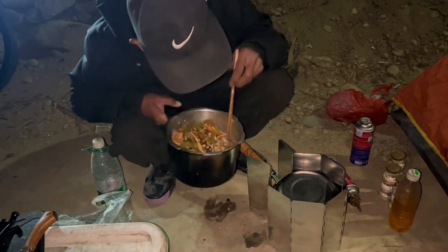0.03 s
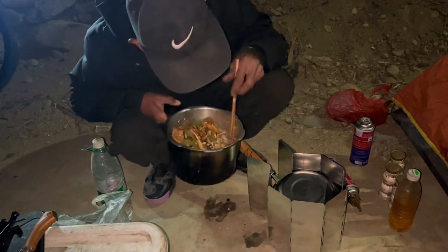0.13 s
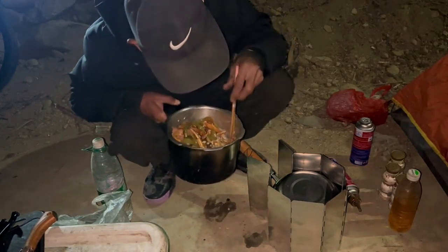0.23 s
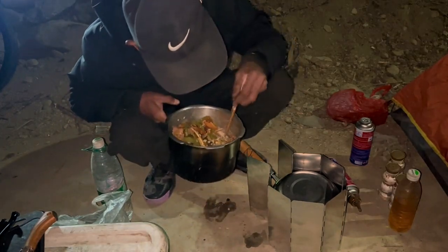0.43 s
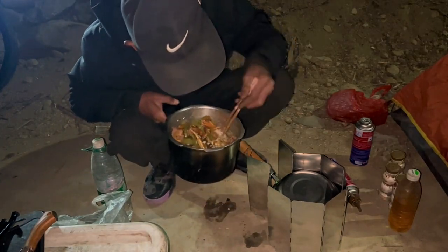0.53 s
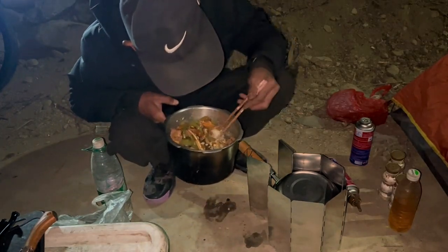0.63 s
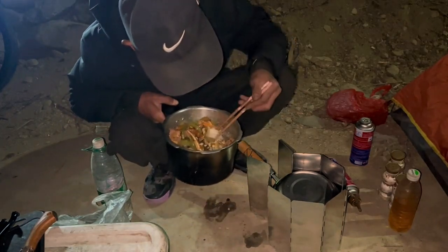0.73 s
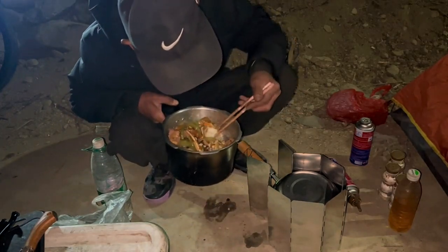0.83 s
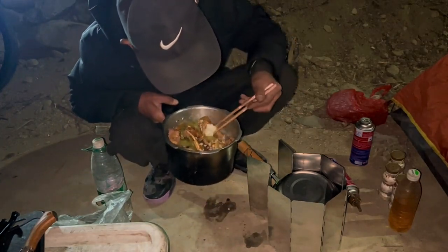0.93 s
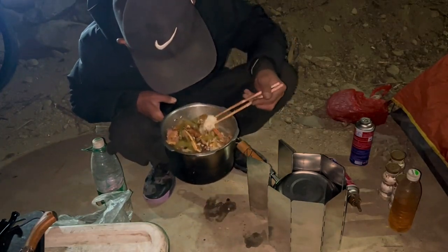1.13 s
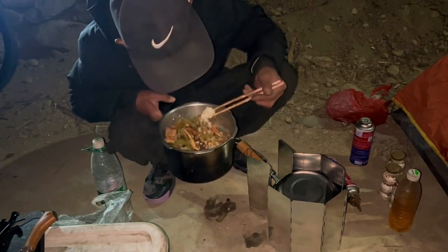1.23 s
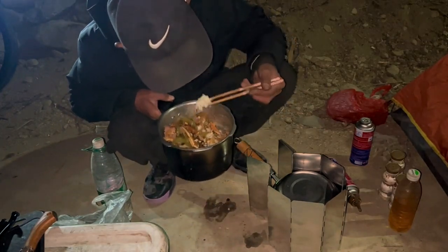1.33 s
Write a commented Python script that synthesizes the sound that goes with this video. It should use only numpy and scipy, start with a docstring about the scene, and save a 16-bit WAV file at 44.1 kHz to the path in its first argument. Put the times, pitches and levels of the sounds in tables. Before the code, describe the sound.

Wooden chopsticks rummage through food in a metal pot, with faint wet scrapes and a thin, wavering hiss. A damped click comes right at the start, the loudest clicks at about 0.25 seconds. Soft, low knocks that fall in pitch run from there to 0.9 seconds, strongest near 0.3. More rummaging leads to a double click near 1.35 seconds. A steady rush like a distant stream continues throughout.

```python
"""Someone eats from a metal pot outdoors at night. From the start there is a steady rush, like a stream
some way off, and a thin hiss that rises and falls as wooden chopsticks keep rummaging in the food.
Almost at once they click against the pot, whose ring is damped by the food. A quarter of a second in
come the loudest clicks and the first of a few soft, low knocks that slide down in pitch as they die.
The knocks end before the one-second mark; more rummaging and a last double click follow."""
import sys
import numpy as np
from scipy import signal
from scipy.fft import rfft, irfft
from scipy.io import wavfile
from scipy.ndimage import uniform_filter1d

SR = 44100
rng = np.random.default_rng(int(sys.argv[2]) if len(sys.argv) > 2 else 0)


def store_pcm(level_fs):
    """Save levels as 16-bit WAV."""
    pcm = np.round(np.clip(level_fs, -1, 1) * 32767).astype(np.int16)
    wavfile.write(sys.argv[1], SR, np.atleast_2d(pcm).T)


N = 61739

# tone of the rush and the hiss: what both ears share, and what differs between them
# (frequency [Hz], relative level [dB])
RUSH_TONE = [(15, -48), (25, -18), (70, -4), (107, -7.5), (176, 1), (248, -3.5), (316, -4.5), (468, -3.5),
             (519, -2.5), (706, -13.5), (769, -19), (824, -20), (1080, -26), (1330, -26.5), (1500, -29),
             (1950, -57), (3300, -120)]
RUSH_SIDE_TONE = [(15, -33), (25, -50), (59, -1.5), (98, -7), (280, -10.5), (437, -1.5), (476, -4.5),
                  (1500, -20), (1950, -52), (3300, -120)]
HISS_TONE = [(880, -45), (1500, -10.5), (1760, -2), (1950, 7), (2480, -1), (2630, -10), (2970, -2),
             (3140, -7), (3410, 0.5), (3680, -11.5), (4000, -8), (5500, -12), (5930, -9), (6390, -11.5),
             (7140, -10), (7990, -24), (8450, -13.5), (9450, -15), (10300, -15.5), (13000, -24.5),
             (14000, -27)]
HISS_SIDE_TONE = [(1500, -9.5), (1890, -8.5), (2160, -10), (2900, -8.5), (4300, -14), (5000, -4.5),
                  (5700, -3), (6200, -15), (7400, -12.5), (8500, -9), (10500, -20.5), (11500, -55),
                  (14000, -27)]
# the hiss rises and falls as the chopsticks keep rummaging in the food (time [s], level change [dB])
RUMMAGING_LEVEL = [(0, 1.3), (.12, -1.5), (.17, -1.5), (.24, 1.7), (.30, 2), (.36, -2), (.44, 1), (.52, -1),
                   (.59, 1.9), (.67, 1), (.72, -1), (.76, 1.5), (.82, -0.5), (.90, 1.2), (1.0, -0.1),
                   (1.08, 0.5), (1.4, 0.8)]
# how the background leans to one side (frequency [Hz], left minus right [dB])
BACKGROUND_LEAN = [(60, -1), (200, 0), (370, -1.5), (670, -4.5), (1230, 2), (1950, -5.5), (2300, -1),
                   (2650, 0.5), (3300, -0.5), (4100, 0.5), (7500, 1), (13700, -1)]
# the background reaches the right ear first (frequency [Hz], head start [radians])
RIGHT_HEAD_START = [(100, 0), (500, 0.27), (1100, 0.21), (1850, .75), (3400, 0.24), (4500, 0.13)]
# chopstick touches; a short rise makes a tick, a longer one a glancing touch (time [s], peak [dB],
# left minus right [dB], centre pitch [Hz], pitch spread [octaves], fade time stretch [x], rise [s])
STICK_TOUCHES = [(0.0305, -43, -1, 2370, 0.15, 2, 0.00067), (0.0366, -50, -2, 2800, 0.19, 1.5, 0.00072),
                 (0.259, -45, -3, 4700, 0.18, 1.2, 0.00048), (0.2615, -42.5, 15, 3600, 0.37, 0.66, .0005),
                 (0.26402, -26.3, 3, 3800, .42, .45, .00028), (0.26474, -27, 0, 3800, .42, .45, .00028),
                 (0.2648, -46.5, 7, 10000, .25, 0.51, 0.00026),
                 (0.2695, -46.5, -19, 4060, 1, 0.59, 0.00084),
                 (0.2733, -50, -12, 11500, 0.35, 1.8, 0.00091), (0.277, -50, 20, 11500, 0.69, 1.3, .0005),
                 (0.4, -58, 6, 1150, 0.27, 1.1, 0.001), (0.8409, -49.5, -6, 2880, 0.056, 3.3, 0.0027),
                 (1.3483, -46, -2, 4400, .7, 0.47, .0005), (1.352, -45.5, -5, 4200, 0.6, 0.67, 0.00044)]
# the notes that the pot and sticks ring with (pitch [Hz], relative level [dB], time to fade 60 dB [s])
POT_NOTES = [(1200, -7, 0.02), (2244, -35, 0.014), (2930, -17, 0.0058), (3150, -13.5, 0.024),
             (3724, 9, 0.0051), (4170, 0, 0.0094), (4600, -1, 0.0084), (5410, -14, 0.02),
             (5680, -19, 0.022), (6800, -26, 0.0054), (10000, -14.5, 0.0081), (11800, -13.5, 0.0044)]
# moves through the food (middle time [s], half length [s], level [dB], amount of crackle [0-1])
FOOD_STIRS = [(0.038, 0.0093, -61, 0.2), (0.227, 0.0051, -53, 0), (0.264, 0.015, -57, 0.85),
              (0.432, 0.017, -59, 0.3), (0.582, 0.012, -53.5, 0), (0.746, 0.017, -58, 0.2),
              (0.892, .011, -55, 0), (0.927, 0.0088, -53, 0.02), (1.235, 0.0086, -58, 0.3),
              (1.393, 0.011, -57, 0.1)]
# tone of the dull scrape and the bright crackle (frequency [Hz], relative level [dB])
SCRAPE_TONE = [(500, -23), (1350, -21), (1700, -3.5), (2000, 3.5), (2400, -7.5), (2900, -9), (4200, -15.5),
               (8000, -17.5), (14000, -40)]
CRACKLE_TONE = [(1000, -34), (3000, -25), (5500, 7), (7500, -0.5), (11000, -7), (14000, -20)]
# low knocks (time [s], peak [dB], starting pitch [Hz], time to the peak [s],
# how fast each vibration gets longer [s per s], tap level [dB])
LOW_KNOCKS = [(0.2334, -34, 498, 0.0093, 0.45, -57), (0.2778, -36.5, 340, 0.013, 0.555, -50),
              (0.3161, -21.5, 500, 0.0086, 0.75, -38.5), (0.432, -38.5, 420, 0.015, 0.31, -72),
              (0.449, -33, 111, 0.0064, 0.17, -74), (0.579, -39.5, 170, 0.0068, 0.16, -72),
              (0.757, -42.5, 199, 0.0076, 0.44, -74), (0.847, -46.5, 89, 0.015, 0.23, -67)]
# notes of the tap just ahead of each knock (pitch [Hz], relative level [dB], time to fade 60 dB [s])
TAP_NOTES = [(433, 5, 0.049), (556, -20, 0.016), (723, 1.5, 0.023), (852, -6, 0.018)]

RUSH_DB, RUSH_SIDE_DB, HISS_DB, HISS_SIDE_DB = -47.5, -60.5, -57, -59
SPLIT_HZ, TOP_HZ = 1500, 14100  # where rush gives way to hiss; where the treble ends
FLICKERS_PER_S, FLICKER_DB = 25, 1.23
DIP_TIME_S, DIP_HALF_S, DIP_DB = 0.271, 0.026, -9.5  # the rush dips briefly
RIGHT_DELAY_S = 0.00003  # clicks reach the left ear first
ECHO_DB, ECHO_FADE_S = -31, 0.13
FOOD_GRAIN_DB = 2.5  # higher = grittier
TAP_LEAD_S, TAP_RISE_S = 0.00232, 0.00059
KNOCK_SHAPE = 0.58  # higher = narrower swell


def undb(db):
    """Turn decibels into a number to multiply by."""
    return 10 ** (np.asarray(db) / 20)


def unit(x):
    """Scale a signal to an average power of 1."""
    return x / np.sqrt(np.mean(x ** 2))


def colour(x, points, band=(0, np.inf)):
    """Shape the tone by (frequency [Hz], level [dB]) points, keeping only the given band."""
    f = np.arange(N // 2 + 1) * SR / N
    hz, db = np.array(points, float).T
    gain = undb(np.interp(np.log(f + 1), np.log(np.sort(hz) + 1), db))
    return irfft(rfft(x) * gain * (f >= band[0]) * (f < band[1]), N)


def advance(x, points):
    """Move the waves earlier by (frequency [Hz], head start [radians]) points."""
    f = np.arange(N // 2 + 1) * SR / N
    radians = np.interp(f, *np.array(points, float).T)
    return irfft(rfft(x) * np.exp(1j * radians), N)


def wander(rate):
    """Glide to a new random value `rate` times a second."""
    hold = max(int(SR / rate), 1)
    steps = rng.standard_normal(N)[np.arange(N) // hold]
    return unit(uniform_filter1d(steps, hold))


def since(start):
    """Seconds since a moment, zero before it."""
    return np.maximum(np.arange(N) / SR - start, 0)


def pan(db):
    """Left and right gains that make the left louder by `db`."""
    return undb(np.array([[db], [-db]]) / 2)


def rush_and_hiss():
    """A low, flickering rush, and a wider hiss that rises and falls as the chopsticks keep rummaging."""
    def noise(tone, band):
        return unit(colour(rng.standard_normal(N), tone, band))
    t = since(0)
    low, high = (0, SPLIT_HZ), (SPLIT_HZ, np.inf)
    dip_db = DIP_DB * np.exp(-((t - DIP_TIME_S) / DIP_HALF_S) ** 2)
    flicker_db = FLICKER_DB * wander(FLICKERS_PER_S)
    rush = undb(RUSH_DB + dip_db + flicker_db) * noise(RUSH_TONE, low)
    rummaging_db = np.interp(t, *np.array(RUMMAGING_LEVEL).T)
    hiss = undb(HISS_DB + rummaging_db) * noise(HISS_TONE, high)
    # noise added on the left and taken away on the right makes the sound wide
    side = undb(RUSH_SIDE_DB) * noise(RUSH_SIDE_TONE, low)
    side += undb(HISS_SIDE_DB + rummaging_db) * noise(HISS_SIDE_TONE, high)
    left = colour(rush + hiss + side, [(hz, db / 2) for hz, db in BACKGROUND_LEAN])
    right = colour(rush + hiss - side, [(hz, -db / 2) for hz, db in BACKGROUND_LEAN])
    return np.array([left, advance(right, RIGHT_HEAD_START)])


def chopstick_clicks():
    """Each touch briefly rings the pot's notes near its own pitch; things lying around echo it faintly."""
    clicks = np.zeros((2, N))
    for start, db, side_db, centre_hz, spread, stretch, rise in STICK_TOUCHES:
        t = np.array([since(start), since(start + RIGHT_DELAY_S)])
        ring = np.zeros((2, N))
        for hz, note_db, fade_s in POT_NOTES:
            share = np.exp(-(np.log2(hz / centre_hz) / spread) ** 2 / 2)
            fade = undb(note_db - 60 * t / (fade_s * stretch))
            ring += share * fade * np.sin(2 * np.pi * hz * t)
        ring *= 1 - np.exp(-(t / rise) ** 2)
        clicks += undb(db) * pan(side_db) * ring / np.abs(ring).max()
    echoes = rng.standard_normal((2, N)) * undb(ECHO_DB - 60 * since(0) / ECHO_FADE_S) / 2
    return clicks + signal.fftconvolve(clicks, echoes, axes=1)[:, :N]


def rummaging():
    """Short swells of dull scraping and tiny wet crackles as the sticks move through the food."""
    def gritty_noise(tone):
        noise = rng.standard_normal((3, N))
        spikes = undb(FOOD_GRAIN_DB * np.minimum(rng.exponential(size=N), 5))
        both, left, right = (unit(colour(row, tone)) for row in noise * spikes)
        return both + np.array([left, right]) / 2
    scrape, crackle = gritty_noise(SCRAPE_TONE), gritty_noise(CRACKLE_TONE)
    out = np.zeros((2, N))
    for middle, half_length, db, crackle_amount in FOOD_STIRS:
        swell = np.exp(-((since(0) - middle) / half_length) ** 2)
        out += undb(db) * swell * (scrape + crackle_amount * crackle)
    return out


def knocks():
    """A light tap, then a thud that falls in pitch: high notes arrive first, as in bending waves."""
    out = np.zeros(N)
    for start, db, start_hz, rise, growth, tap_db in LOW_KNOCKS:
        t = since(start)
        cycles = np.log1p(growth * start_hz * t) / growth  # each vibration outlasts the one before
        swell = t / rise * np.exp((1 - (t / rise) ** 2) / 2)
        out -= undb(db) * swell ** KNOCK_SHAPE * np.sin(2 * np.pi * cycles)
        t = since(start - TAP_LEAD_S)
        tap = sum(undb(note_db - 60 * t / fade_s) * np.sin(2 * np.pi * hz * t)
                  for hz, note_db, fade_s in TAP_NOTES)
        fade_in = 1 - np.exp(-(t / TAP_RISE_S) ** 2)
        out -= undb(tap_db) * fade_in * tap
    return out * pan(db=1.05)


def scene():
    """The meal in front of the steady rush."""
    return rush_and_hiss() + chopstick_clicks() + rummaging() + knocks()


def record(dry):
    """Cut away the very highest treble."""
    return signal.sosfilt(signal.ellip(10, .2, 80, TOP_HZ, fs=SR, output="sos"), dry)


dry = scene()
out = record(dry)
store_pcm(out)
```